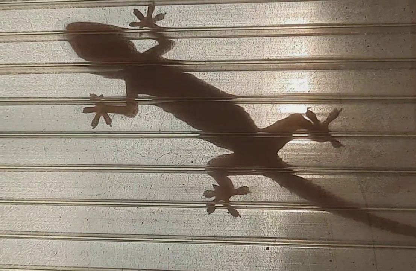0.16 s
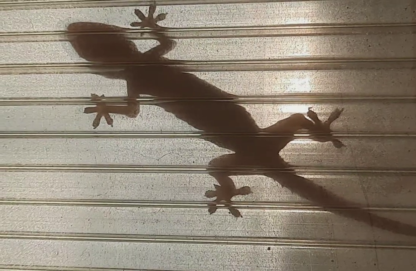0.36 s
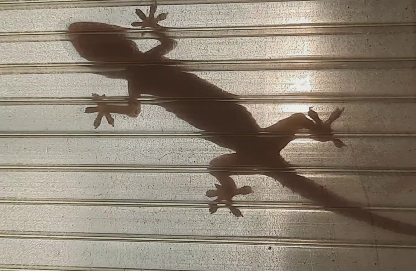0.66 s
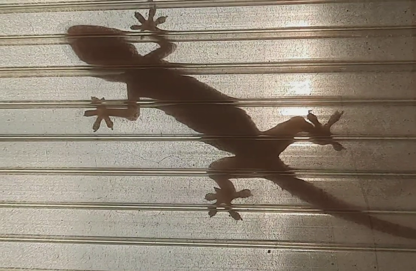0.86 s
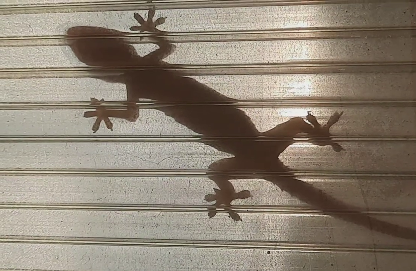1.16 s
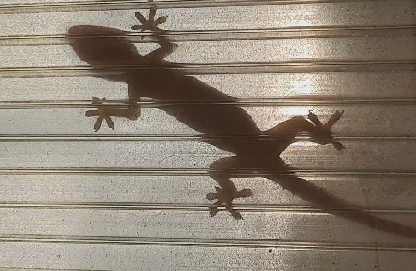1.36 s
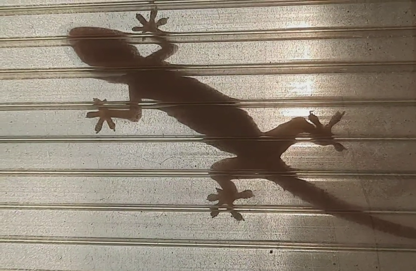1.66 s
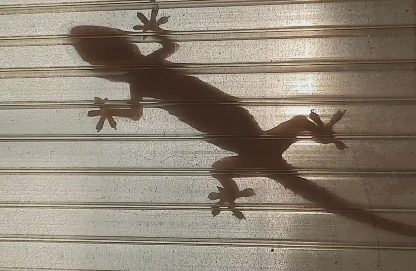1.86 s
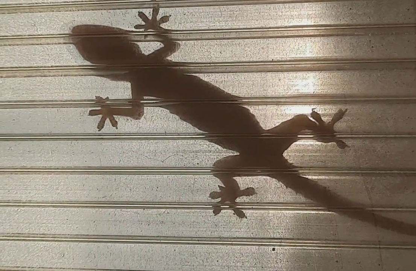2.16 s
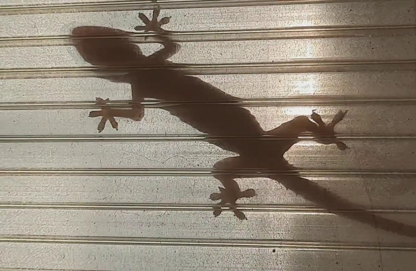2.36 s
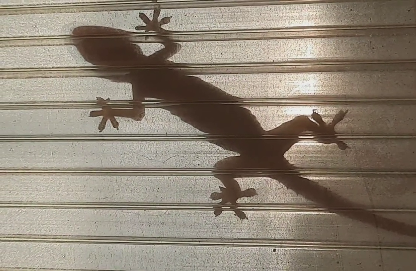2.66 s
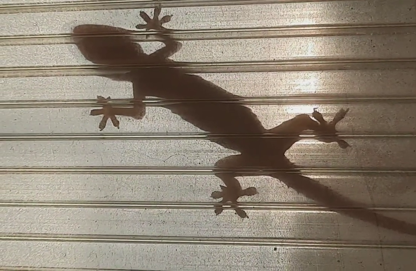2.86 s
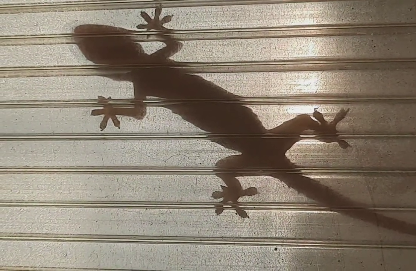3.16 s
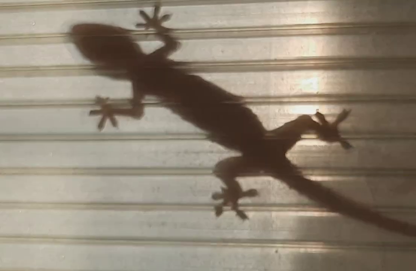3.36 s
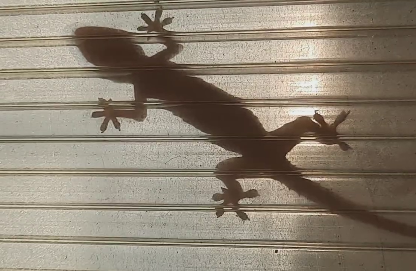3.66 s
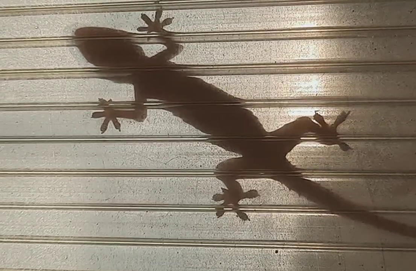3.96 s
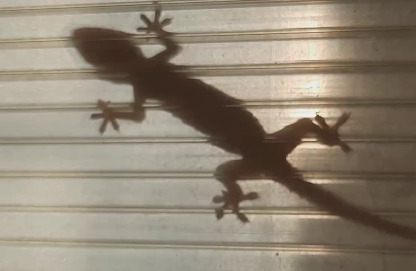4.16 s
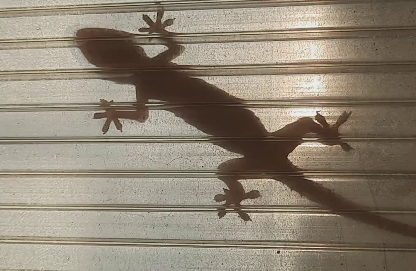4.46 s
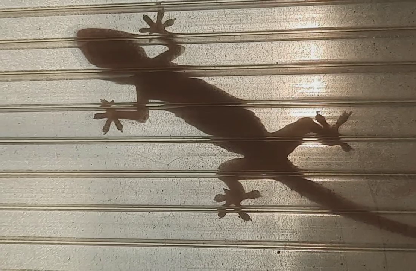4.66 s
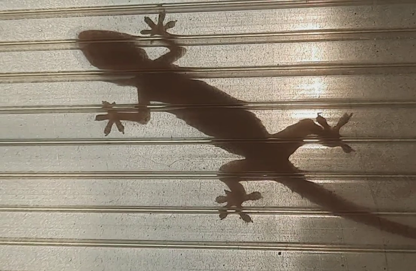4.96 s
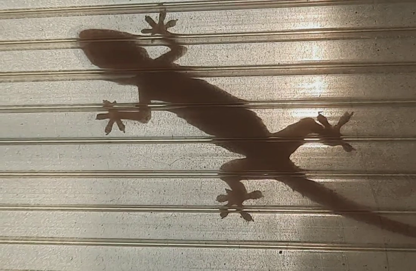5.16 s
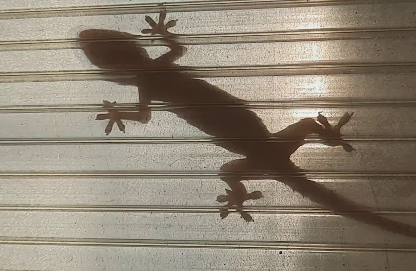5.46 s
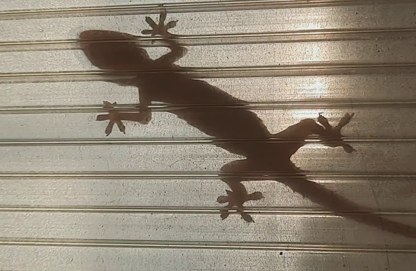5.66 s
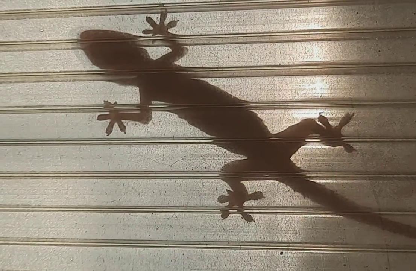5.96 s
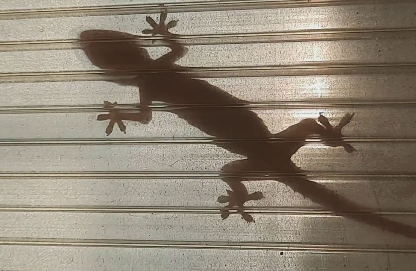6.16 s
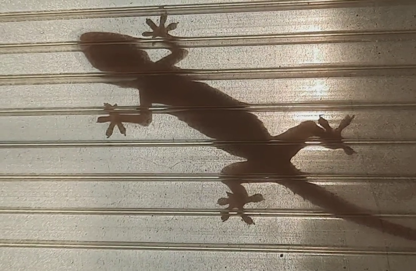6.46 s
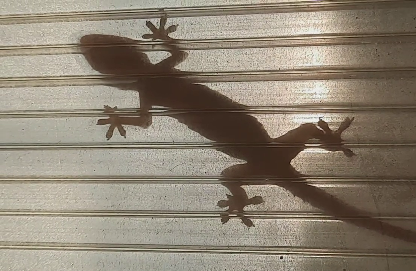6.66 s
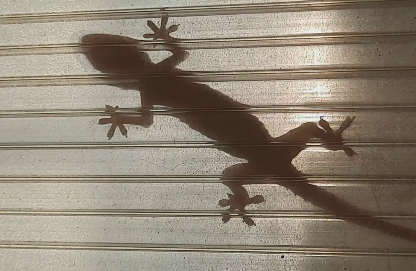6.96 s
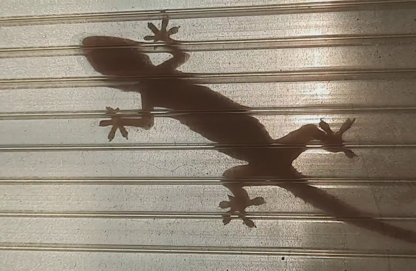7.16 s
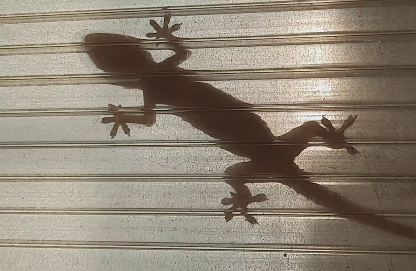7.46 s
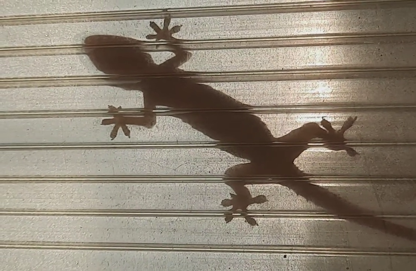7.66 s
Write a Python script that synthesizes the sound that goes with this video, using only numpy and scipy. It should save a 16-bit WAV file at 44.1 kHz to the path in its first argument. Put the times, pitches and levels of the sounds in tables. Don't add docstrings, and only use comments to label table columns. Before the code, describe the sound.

A small quiet room with a steady, deep 50 hertz mains hum throughout, plus soft far fan rumble, very faint motor whine, thin hiss and a barely audible distant cricket band. Close to the microphone a gecko on a ribbed pane gives four double chirps. The first falling chirp is already under way at 0 s, answered at 0.15 s by a longer arching one; further pairs come at 2.4 and 2.6, 4.9 and 5.06, 7.34 and 7.5 s. The falling chirps last about a twentieth of a second, dropping into a loose creak; the arching ones are slightly longer, brighter and more open, climbing to a squeaky peak before dipping. Edges are rough and clicky, middles clean. Short hard reflections follow. Tiny ticks occur around 4.2, 5.3, 5.6 and, paired, 5.9 s. The image is nearly mono, and hum alone fills the gaps until the end.

```python
import sys
import numpy as np
from scipy import signal
from scipy.fft import rfft, irfft
from scipy.io import wavfile
from scipy.ndimage import uniform_filter1d

SR = 44100
rng = np.random.default_rng(int(sys.argv[2]) if len(sys.argv) > 2 else 0)


def voltage_ratio(decibels):
    exponent = np.asarray(decibels, float) / 20
    return 10 ** exponent


def wav_out(sig):
    wavfile.write(sys.argv[1], SR, np.round(np.clip(np.atleast_2d(sig).T, -1, 1) * 32767).astype(np.int16))


N = 344862

MAINS_HZ = 49.973
HUM_OVERTONES = [(1, -34.1), (3, -73), (5, -73), (9, -71.5), (11, -79), (15, -85), (17, -90), (19, -88),
                 (21, -89)]
# pitch_hz [Hz], level_db [rms dB]
MOTOR_WHINES = [(467, -77), (12236, -96)]

# pitch_hz [Hz], density_db [dB per Hz]
AIR_SPECTRUM = [(30, -4.5), (85, 0.5), (113, -0.5), (208, -9), (253, 1.5), (294, -10.5), (417, -17.5),
                (465, -9.5), (500, -17.5), (673, -12.5), (750, -20), (784, -22), (975, -21), (3000, -28),
                (15500, -31.5)]
AIR_DB, AIR_SIDE_DB = -57, -37
RUMBLE_BELOW_HZ, RUMBLE_SWELL_DB = 120, 1.5

CRICKET_HZ, CRICKET_WIDTH_HZ, CRICKET_DB = 6710, 200, -83

# start_s [s], peak_db [dB], pitch_hz [Hz]
HOUSE_TICKS = [
    (4.24, -54.5, 10920),
    (5.285, -54, 2000),
    (5.6, -53, 3600),
    (5.918, -52, 4000),
    (5.935, -53, 2500),
]

# delay_s [s], level_db [dB]
PANE_ECHOES = [(.0018, -15), (.0034, -18), (.0058, -21.5), (.0087, -19)]
# t60_s [s], level_db [dB]
ROOM_TAILS = [(.05, -16.5), (.25, -50)]
ROOM_SIDE_DB = -7

# start_s [s], top_s [s], top_rate_hz [pulses per s], fall_s [s], effort_db [dB]
FALLING_CHIRPS = [
    (0, 0.006, 2320, 0.017, 0.5),
    (2.429, 2.439, 2570, 0.021, 0),
    (4.903, 4.910, 2400, .020, -0.5),
    (7.338, 7.34, 2720, 0.023, -1.5),
]
RISE_S, FALL_POWER = 0.016, 2.2
FALL_LENGTHS = 2.1
SLACK_HZ = 400
EFFORT_DB_PER_OCTAVE = 5.5
ATTACK_S, ATTACK_DB = 0.0046, -0.5

# time_s [s], rate_hz [pulses per s]
ARCHING_CHIRPS = [
    [(.153, 1310), (.164, 1330), (.170, 1200), (.172, 1650), (.179, 2210), (.192, 2460), (.206, 2555),
     (.212, 2440), (.222, 2090)],
    [(2.601, 1550), (2.606, 1950), (2.616, 2100), (2.621, 2320), (2.626, 2460), (2.633, 2615),
     (2.644, 2745), (2.652, 2510), (2.6595, 2380)],
    [(5.0595, 1200), (5.064, 1320), (5.078, 1060), (5.090, 2100), (5.094, 2280), (5.110, 2565),
     (5.118, 2580), (5.129, 2190), (5.1325, 2150)],
    [(7.494, 1600), (7.499, 2000), (7.506, 1960), (7.522, 2320), (7.527, 2365), (7.535, 2610),
     (7.546, 2850), (7.554, 2520), (7.562, 2330)],
]
ARCHING_EFFORT = [
    [-7, 3, -5, 0, 2.5, 4.7, 9, 5, 3],
    [-5, -1.5, 1, 3, 6.5, 3.5, 6.5, 8.5, 1],
    [-5.5, .5, -3.5, -2.5, 3.5, 4, 4.5, 3.9, 2],
    [-13, 1, -3.5, 4, 3.5, 6, 1.5, 10, -0.5],
]
FLICK_S, FLICK_HZ, FLICK_DB = 0.004, 169, -10

# time_s [s], level_db [dB]
LONE_PULSES = [(0.0374, -6.5), (2.482, -12), (2.4905, -25), (2.6022, -5.5), (4.9658, -7.5), (4.9766, -10),
               (7.385, -10.5), (7.3922, -12.5), (7.4005, -25), (7.494, 3), (7.570, -26), (7.574, -23),
               (7.577, -23.5), (7.580, -31)]
PULSE_LOW_HZ, PULSE_HIGH_HZ = 1520, 5800
GLIDE_ROUGH_S, CLEAN_GLIDE_PER_S = 0.004, 22
SLOW_ROUGH, STEADY_HZ = 0.45, 2150
ONSET_ROUGH, ONSET_S = 0.25, 0.0022

# pouch_db, nose_db, mouth_db [dB]
CHIRP_VOICING = [(4, 3.5, -11), (-19, 1, -6.5), (5, 5.5, -11), (-14, -23, -2.5), (5, 5, -12.5),
                 (-9, -6, -1.5), (6, 15.5, -18), (-16.5, -14, -2)]
# pitch_hz [Hz], width_hz [Hz], level_db [dB]
POUCH_MODES = [(1352, 230, -15.5), (2386, 213, -16.5), (2725, 59, -6.5)]
# pitch_hz [Hz], width_hz [Hz], level_db [dB]
NOSE_MODES = [(3500, 450, -19)]
# pitch_hz [Hz], width_hz [Hz], level_db [dB]
THROAT_MODES = [(4160, 200, -10.5), (4656, 204, 4.5)]
SLACK_THROAT_MODES, THROAT_SLACK_DB = [(4800, 890, -5)], -4.5
# pitch_hz [Hz], width_hz [Hz], level_db [dB]
MOUTH_MODES = [(5170, 260, 3.5), (8030, 438, -10.5), (8530, 485, -6), (9400, 250, -11),
               (10000, 345.4, -11.5), (11600, 240, -9.5)]
# pitch_hz [Hz], width_hz [Hz], level_db [dB]
LIP_MODES = [(5680, 98, -13), (7160, 350, -17.5)]
POUCH_SLACK_DB, POUCH_FULL_HZ = -12.5, 2170
MOUTH_SLACK_DB, LIPS_SLACK_DB = -7.5, -6.5

CUTOFF_HZ, OFFSET = 15720, -0.0028
STARVE_HZ, STARVE_ABOVE_DB, STARVE_HOLD_S = 13300, -28.5, 0.05


def rms_one(x):
    return x / np.sqrt(np.mean(x ** 2) + 1e-20)


def drift(hz):
    lowpass = signal.butter(2, hz * 100, fs=SR, output="sos")
    slow = signal.sosfilt(lowpass, rng.standard_normal(N // 100 + 500))[400:]
    return np.interp(np.arange(N) / 100, np.arange(len(slow)), rms_one(slow))


def resonance(x, hz, width_hz):
    r = np.exp(-np.pi * width_hz / SR)
    zeros = np.array([1, 0, -1]) * (1 - r * r) / 2
    poles = [1, -2 * r * np.cos(2 * np.pi * hz / SR), r * r]
    return signal.lfilter(zeros, poles, x)


def body(x, modes):
    return sum(voltage_ratio(db) * resonance(x, hz, width_hz) for hz, width_hz, db in modes)


def hum():
    t = np.arange(N) / SR
    lines = [(round(k) * MAINS_HZ, db) for k, db in HUM_OVERTONES] + MOTOR_WHINES
    phases = rng.uniform(0, 2 * np.pi, len(lines))
    phases[0] = 1.15
    return sum(np.sqrt(2) * voltage_ratio(db) * np.cos(2 * np.pi * hz * t + p) for (hz, db), p in zip(lines, phases))


def air():
    hz = np.fft.rfftfreq(N, 1 / SR) + 1
    at_hz, db = np.transpose(AIR_SPECTRUM)
    colour = voltage_ratio(np.interp(np.log(hz), np.log(at_hz), db)) * (hz > 15)
    noise = rfft(rng.standard_normal(N)) * colour
    swell = voltage_ratio(RUMBLE_SWELL_DB * drift(3.2))
    hiss = irfft(noise * (hz > RUMBLE_BELOW_HZ), N)
    rumble = irfft(noise * (hz <= RUMBLE_BELOW_HZ), N)
    return rms_one(hiss + swell * rumble)


def cricket():
    band = rng.standard_normal(N)
    for _ in range(2):
        band = resonance(band, CRICKET_HZ, CRICKET_WIDTH_HZ)
    return voltage_ratio(CRICKET_DB + 1.2 * drift(4)) * rms_one(band)


def ticks():
    out, t = np.zeros(N), np.arange(600) / SR
    for start_s, db, hz in HOUSE_TICKS:
        burst = resonance(rng.standard_normal(len(t)), hz, 0.61 * hz) * voltage_ratio(-60 * t / 0.014)
        first = round(start_s * SR)
        out[first:first + len(t)] += voltage_ratio(db) * burst / np.abs(burst).max()
    return out


def room(x):
    t = np.arange(SR // 3) / SR
    decay = sum(voltage_ratio(db) * rms_one(voltage_ratio(-60 * t / t60)) for t60, db in ROOM_TAILS)
    tail = decay * rng.standard_normal(len(t)) * (t > 0.004)
    return signal.fftconvolve(x, tail / np.sqrt(len(t)))[:N]


def fall(start, top, top_hz, fall_s, db):
    t = np.arange(round(max(start, 0) * SR), round((top + FALL_LENGTHS * fall_s) * SR)) / SR
    rising = ((top - t) / RISE_S) ** 2
    falling = (np.abs(t - top) / fall_s) ** FALL_POWER
    bell = np.exp(-np.where(t < top, rising, falling))
    rate = SLACK_HZ + (top_hz - SLACK_HZ) * bell
    attack = ATTACK_DB * np.clip(1 - (t - start) / ATTACK_S, 0, 1)
    return t, rate, db + EFFORT_DB_PER_OCTAVE * np.log2(rate / top_hz) + attack


def arch(rows, effort_db):
    flick = np.add(rows[-1], (FLICK_S, FLICK_HZ))
    at_s, hz = np.transpose(list(rows) + [flick])
    t = np.arange(round(at_s[0] * SR), round(at_s[-1] * SR)) / SR
    effort = np.append(effort_db, effort_db[-1] + FLICK_DB)
    return t, np.interp(t, at_s, hz), np.interp(t, at_s, effort)


def pulses(at, sizes, size):
    taps = np.floor(at)[:, None] + np.arange(-7, 9)
    away = taps - at[:, None]
    shape = np.sinc(away) * np.cos(np.pi / 16 * away) ** 2
    places = np.clip(taps, 0, size - 1).astype(int)
    return np.bincount(places.ravel(), (sizes[:, None] * shape).ravel(), size)


def larynx(t, rate, db, lone, start, size):
    glide = uniform_filter1d(np.abs(np.gradient(np.log(rate), t)), size=80, mode="nearest")
    rough = GLIDE_ROUGH_S * np.maximum(glide - CLEAN_GLIDE_PER_S, 0)
    rough = rough + SLOW_ROUGH * np.maximum(1 - rate / STEADY_HZ, 0)
    rough = rough + ONSET_ROUGH * np.exp(-(t - t[0]) / ONSET_S)
    cycles = np.cumsum(rate) / SR
    beat = np.interp(np.arange(int(cycles[-1]) + 1), cycles, t)
    chance = rng.standard_normal((400, 2))[:len(beat)]
    shake = np.clip(np.interp(beat, t, rough), 0.012, 0.5)
    at = beat + 0.22 * shake * chance[:, 0] / np.interp(beat, t, rate)
    sizes = voltage_ratio(np.interp(beat, t, db) + 4.4 * shake * chance[:, 1])
    at = np.append(at, [pulse[0] for pulse in lone])
    sizes = np.append(sizes, voltage_ratio(np.array([pulse[1] for pulse in lone])))
    clicks = pulses(at * SR - start, sizes, size)
    puffs = signal.sosfilt(signal.butter(6, PULSE_HIGH_HZ, fs=SR, output="sos"), clicks)
    return signal.sosfilt(signal.butter(2, PULSE_LOW_HZ, "high", fs=SR, output="sos"), puffs)


def gecko():
    out, size = np.zeros(N), 5000
    chirps = []
    for short, rows, effort_db in zip(FALLING_CHIRPS, ARCHING_CHIRPS, ARCHING_EFFORT):
        chirps += [fall(*short), arch(rows, effort_db)]
    for (t, rate, db), (pouch_db, nose_db, mouth_db) in zip(chirps, CHIRP_VOICING):
        start = max(round(t[0] * SR) - 120, 0)
        lone = [pulse for pulse in LONE_PULSES if 0 <= pulse[0] * SR - start < size]
        source = larynx(t, rate, db, lone, start, size)
        rate_now = np.interp((start + np.arange(size)) / SR, t, rate)
        slack = np.clip(1 - rate_now / POUCH_FULL_HZ, 0, 1)
        pouch = voltage_ratio(pouch_db + POUCH_SLACK_DB * slack) * body(source, POUCH_MODES)
        nose = voltage_ratio(nose_db) * body(source, NOSE_MODES)
        throat = voltage_ratio(THROAT_SLACK_DB * slack) * body(source, THROAT_MODES)
        throat = throat + slack * body(source, SLACK_THROAT_MODES)
        mouth = voltage_ratio(mouth_db + MOUTH_SLACK_DB * slack) * body(source, MOUTH_MODES)
        lips = voltage_ratio(LIPS_SLACK_DB * slack) * body(source, LIP_MODES)
        out[start:start + size] += pouch + nose + throat + mouth + lips
    echoes = sum(voltage_ratio(db) * np.append(np.zeros(round(s * SR)), out)[:N] for s, db in PANE_ECHOES)
    return out + echoes


def scene():
    voice = gecko()
    mid = voice + room(voice) + voltage_ratio(AIR_DB) * air() + hum() + cricket() + ticks()
    side = voltage_ratio(ROOM_SIDE_DB) * room(voice) + voltage_ratio(AIR_DB + AIR_SIDE_DB) * air()
    return np.array([mid + side, mid - side])


def low_pass(x):
    return signal.sosfilt(signal.butter(12, 16220, fs=SR, output="sos"), x)


def record(dry):
    lowpass = signal.ellip(10, 0.2, 40, CUTOFF_HZ, fs=SR, output="sos")
    cut = signal.sosfiltfilt(lowpass, dry)
    highpass = signal.ellip(8, 0.1, 50, STARVE_HZ, "high", fs=SR, output="sos")
    top = signal.sosfiltfilt(highpass, cut)
    power = uniform_filter1d(np.diff(cut[0], prepend=0) ** 2, size=round(STARVE_HOLD_S * SR))
    loud = power > voltage_ratio(2 * STARVE_ABOVE_DB)
    mix = cut - top * uniform_filter1d(1.0 * loud, size=300) + OFFSET
    return low_pass(mix)


dry = scene()
out = record(dry)
wav_out(out)
```